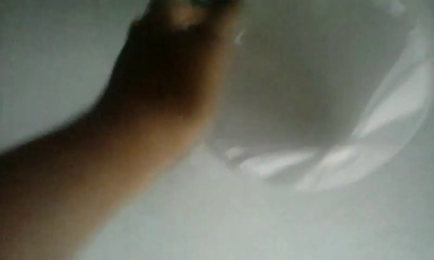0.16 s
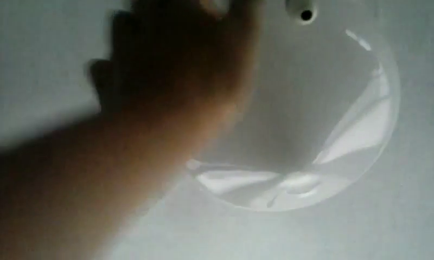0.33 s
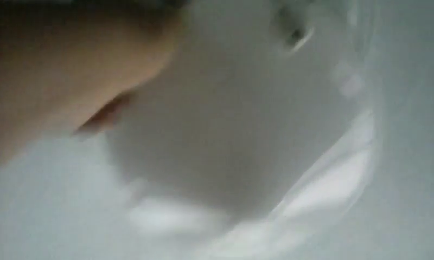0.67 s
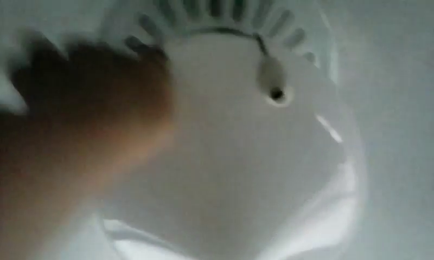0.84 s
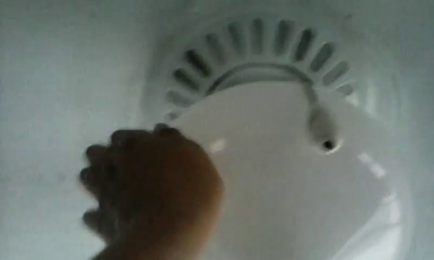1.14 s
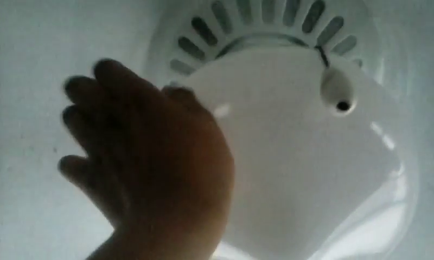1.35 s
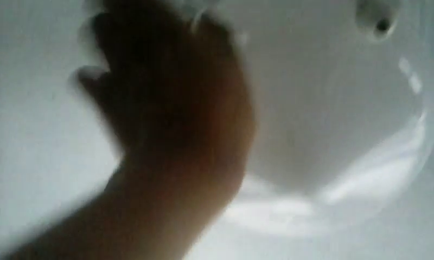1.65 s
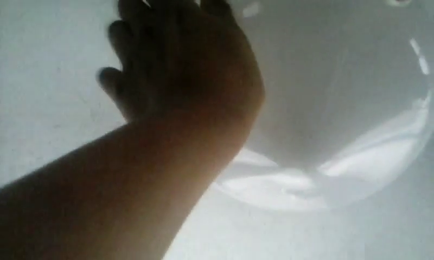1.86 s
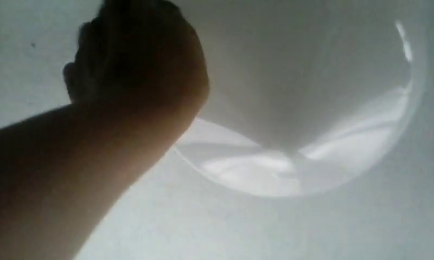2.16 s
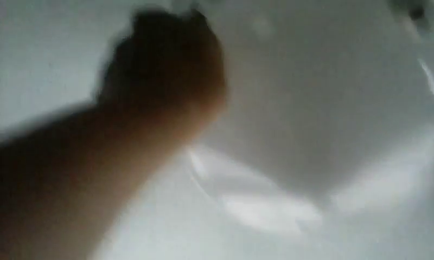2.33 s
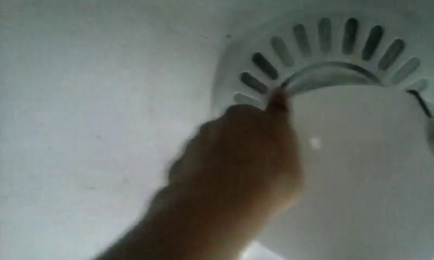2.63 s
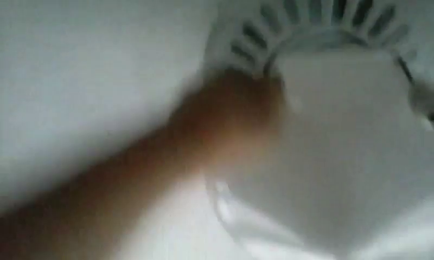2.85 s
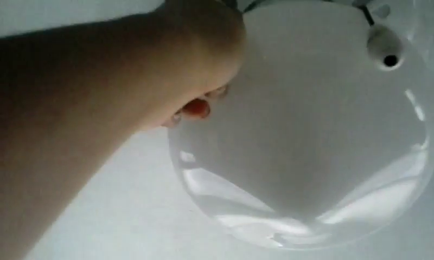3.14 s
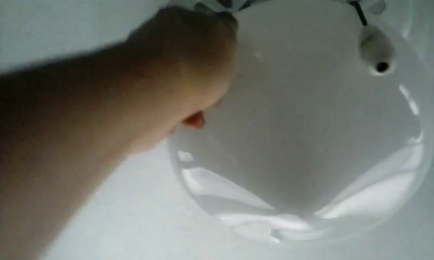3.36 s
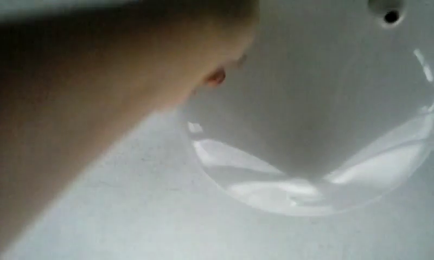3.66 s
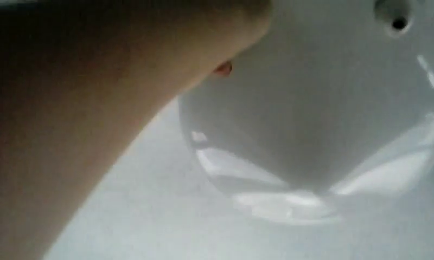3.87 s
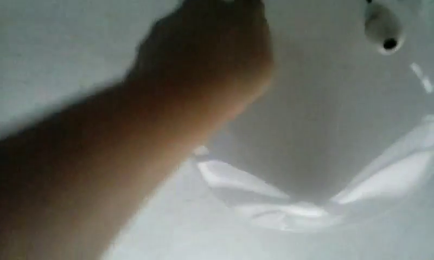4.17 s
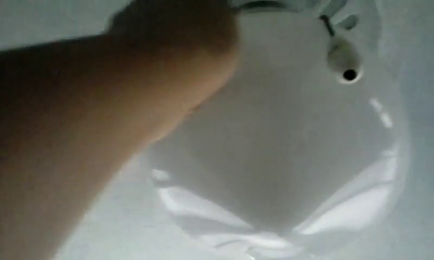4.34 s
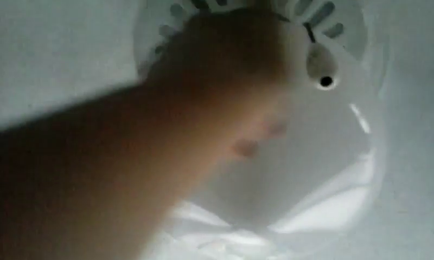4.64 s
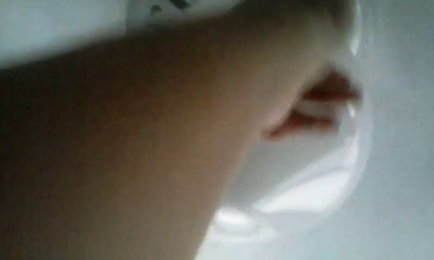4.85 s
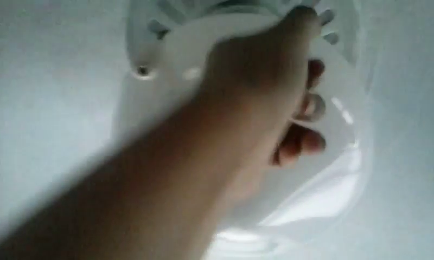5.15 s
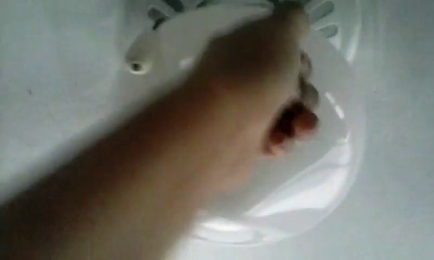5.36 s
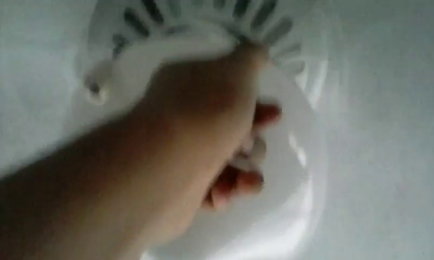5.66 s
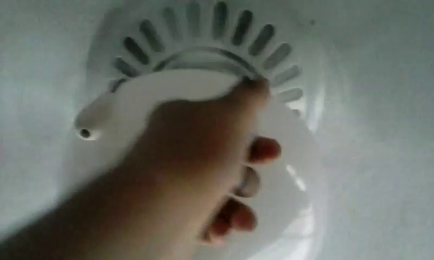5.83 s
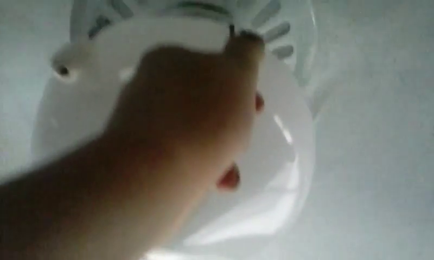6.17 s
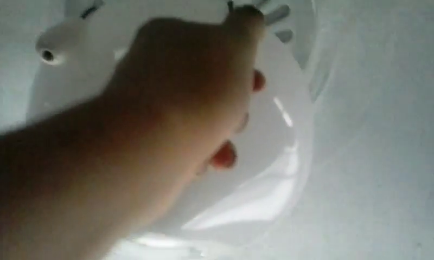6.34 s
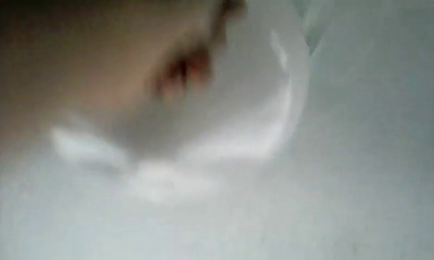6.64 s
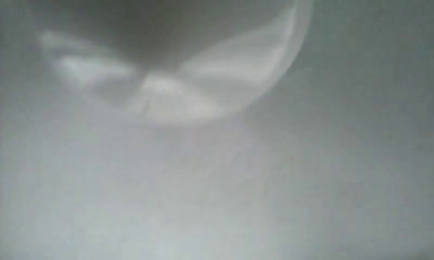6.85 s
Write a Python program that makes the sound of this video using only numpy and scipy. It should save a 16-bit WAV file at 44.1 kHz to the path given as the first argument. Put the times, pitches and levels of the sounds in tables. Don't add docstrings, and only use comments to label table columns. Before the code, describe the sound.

Sharp, dry clicks and thin glass clinks begin over soft room rumble and hiss. After quieter taps and sliding fingers, three rapid groups of loud metallic cracks and chain rattle arrive, each pull booming softly in the ceiling, while a low motor hum runs briefly. Lighter glass knocks lead to one more strong snap, then it fades to faint rubbing. Close, small-room sound with a piercing treble edge.

```python
import sys
import numpy as np
from scipy import signal
from scipy.fft import rfft, irfft
from scipy.io import wavfile

SR = 44100
rng = np.random.default_rng(int(sys.argv[2]) if len(sys.argv) > 2 else 0)


def unload_audio(sound):
    columns = np.transpose(np.atleast_2d(sound))
    steps = np.round(np.clip(columns, -1, 1) * 32767)
    wavfile.write(sys.argv[1], SR, steps.astype(np.int16))


def volts(x):
    e = np.asarray(x, float) / 20
    return 10 ** e


N = 308700
TOP_HZ = 15850

# (lower limit [Hz], upper limit [Hz])
BANDS = [(480, 2000), (2000, 4500), (4500, 6500), (6500, 10000), (10000, 16000)]
CEILING_HZ = [102.9, 224.2, 75.9, 141.5]
# (time [s], boom [dB], upper mode [dB re boom], lower mode [dB re boom], air sway [dB])
THUDS = [(1.93, -46, -23, 8, -64), (2.828, -24, -11, -32, -32), (2.961, -39.5, -4.5, -18, -43.5),
         (3.032, -42.5, -12.5, -0.5, -60), (3.138, -47, -6, -11, -63), (3.518, -25.5, -8.5, -34, -31.5),
         (3.711, -41.5, -13, -28, -39.5), (4.11, -24.5, -10.5, -17, -33), (5.363, -40.5, 4, -20.5, -33.5),
         (5.659, -51.5, 4, 7, -62), (5.948, -48, -11.5, -13, -46.5)]


def rms_one(x):
    return x / np.sqrt(np.mean(x ** 2) + 1e-20)


def drift(rate):
    r = np.exp(-80 * np.pi * rate / SR)
    slow = signal.lfilter([1], [1, -2 * r, r * r], rng.standard_normal(N // 40 + 2002))[2000:]
    return np.interp(np.arange(N) / 40, np.arange(len(slow)), rms_one(slow))


def coloured(spectrum, size):
    hz = np.maximum(np.fft.rfftfreq(size, 1 / SR), 1)
    at, level_db = np.transpose(spectrum)
    white = rfft(rng.standard_normal(size))
    return white * volts(np.interp(np.log(hz), np.log(at), level_db)), hz


def ring(clicks, hz, t60):
    r, w = volts(-60 / (t60 * SR)), 2 * np.pi * hz / SR
    return signal.lfilter([0, np.sin(w)], [1, -2 * r * np.cos(w), r * r], clicks + 1e-18)


def swell_ring(clicks, hz, t60, rise, split):
    contact = ring(clicks, hz, rise) * np.log(1000) / (rise * SR)
    return ring(contact, hz * (1 - split), t60) + ring(contact, hz * (1 + split), 2.3 * t60)


def glass():
    # (time [s], peak [dB], 2-4 kHz body [dB re peak], over 10 kHz edge [dB re peak], t60 [s])
    bead_hits = [(0.505, 1, -37, -38, 0.21), (0.5577, -9, -35, -20, 0.39), (0.5748, -10.5, -16, -16, 0.23),
                 (0.7189, -41, -8, -23, 0.084), (0.7362, -13.5, -20, -14.5, 0.2),
                 (0.954, -30.5, -33, -31, 0.084), (0.969, -26.5, -26, -31, 0.12),
                 (0.988, -18.5, -46, -16, 0.14), (1.288, -28, -22, -26, 0.078),
                 (1.3653, -33.5, -19, -9, 0.08), (1.5517, -34, -22.5, -10, 0.63),
                 (1.7655, -18, -20, -20, 0.49), (2.3966, -19, -52, -17.5, 0.029),
                 (2.732, -35.5, -33, -23, .1), (3.8756, -9.5, -52, -15, 0.27),
                 (4.6825, -23, -21, -13, 0.24), (4.719, -17.5, -27.5, -18, 0.49),
                 (5.0305, -24.5, -22, -17.5, 0.42), (5.093, -35.5, -30, -8, .2),
                 (5.175, -43.5, -30.5, -12, .1), (5.32, -41.5, -30, -15, .1),
                 (5.234, -42, -23.5, -10, 0.032)]
    # (frequency [Hz], level [dB], t60 [s])
    globe = [(2428, -3, 1.3), (3115, 0, 1.0), (3460, -5, 1.0), (4830, -5, 1.0), (5670, 0, 1.0),
             (6590, -12, .5), (6900, -11, .5), (7210, -3, .4), (7430, -5, .4), (7655, 0, .2),
             (7920, -1, .3), (8180, -3, .3), (8560, -6, .25), (8950, -7, .3), (9460, -11, .3),
             (10030, -1, .4), (10720, 0, .4), (11540, -1, .4), (12440, -5, .3), (13470, -8, .3)]
    globe_ring_db = [-20, -19, -27, -17, -14]
    # (frequency [Hz], density [dB per Hz])
    shimmer = [(240, -57.5), (400, -30), (2090, -40), (2360, -20), (2840, -19), (3070, -5), (3310, -24),
               (5190, -34.5), (7870, -0.5), (9920, -19), (16000, -46)]
    # (time [s], frequency [Hz], level [dB])
    glass_parts = [(.508, 3120, -41), (.508, 3400, -43), (.576, 3106, -35), (.576, 3480, -39),
                   (.719, 3100, -43), (.738, 3430, -43), (.738, 3104, -42), (.991, 5660, -52),
                   (2.319, 2940, -56), (3.876, 3380, -39), (3.876, 6360, -33), (3.876, 5820, -42),
                   (3.876, 10600, -36), (4.685, 4820, -55), (4.721, 4800, -48), (4.721, 5590, -39),
                   (.559, 5650, -40), (3.876, 8150, -15.5), (1.77, 3520, -54), (4.721, 2434, -48.5),
                   (4.718, 3150, -60), (5.035, 2770, -54), (5.035, 2970, -64), (5.375, 2250, -35),
                   (6.006, 8220, -35.5)]
    # (time [s], frequency [Hz], level [dB])
    bell = [
        (.508, 2424, -45.5),
        (.576, 2425, -42),
        (.738, 2424, -47),
        (6.5, 2500, -58),
        (6.93, 2470, -60),
    ]
    shoulder_db = -17
    clinks = contacts([(*row, shoulder_db) for row in bead_hits], low_db=-36.5)
    out = struck(clinks, globe, ring_db=globe_ring_db, spread_db=4.5, longest=0.19, rise=0.0033)
    out += rattle(clinks, shimmer, [-14, -13, -17], [0.006, 0.03], grain_db=4.0, ripple_db=3.0, rise=0.0026)
    return out + pings(glass_parts, t60=0.16, loose=0.15) + pings(bell, t60=0.5, loose=0.15)


def metal():
    # (time [s], peak [dB], 2-4 kHz body [dB re peak], t60 [s],
    # 5-6 kHz shoulder [dB re peak])
    pulls = [(2.797, -21, -22, 0.56, -13), (2.8252, -10, -14, 0.43, -4), (2.8394, -6.5, -15.5, 0.19, -8.5),
             (2.861, -11, -12.5, 0.32, -9), (2.8959, -23.5, -17, 0.36, -14), (2.9174, -16, -24, 0.61, -12),
             (3.491, -14.5, -22, 0.59, -4.5), (3.5267, -10, -14.5, 0.45, -14),
             (3.5438, -1.5, -19, 0.083, -5.5), (3.56, -18.5, -3, 0.23, -14),
             (4.0648, -29.5, -22.5, 0.6, -11.5), (4.0946, -12, -24.5, 0.63, -6.5),
             (4.1092, -12, -10.5, 0.45, -9), (4.126, -3, -14.5, 0.17, -10), (4.144, -12, -18, 0.17, -6),
             (5.3499, -14.5, -23, 0.68, -4), (5.3722, 2, -27, 0.05, -14), (5.4, -30, 2, 0.35, 2),
             (5.4325, -15, -50, 0.27, -11)]
    # (time [s], peak [dB], body [dB re peak], edge [dB re peak],
    # shoulder [dB re peak])
    returns = [(2.97, -10.5, -14.5, -32, -5), (3.056, -12, -21.5, -31, -9), (3.103, -14, -14.5, -33, -7.5),
               (3.1658, -3, -17.5, -15, -9), (3.662, -13, -28, -25, -11), (3.6739, -24, -6.5, -25, -4),
               (3.71, -19, -13, -22, -9), (3.7217, -9.5, -24, -27, -8), (3.7513, -9.5, -17, -29, -11),
               (3.7812, -3.5, -19.5, -13.5, -11.5), (4.2605, -18, -31, -26, -14),
               (4.3291, -12.5, -20, -24, -9.5), (4.374, -11.5, -22.5, -30, -11),
               (4.4481, -4.5, -23, -23.5, -6.5), (4.5496, -20.5, -18.5, -15, -11),
               (4.5933, -27.5, -32, -12, -12), (5.6359, -11, -23, -13, -11.5),
               (5.671, -9.5, -15, -10.5, -9)]
    # (time [s], peak [dB], body [dB re peak], edge [dB re peak])
    shifts = [
        (1.8851, -17, -16, -8.5),
        (1.954, -30, -14.5, -13),
        (2.578, -42, -35.5, 6.5),
        (2.6613, -36.5, -30, -7),
        (5.9364, -59.5, 4, -5),
    ]
    # (frequency [Hz], level [dB], t60 [s])
    mount = [(740, -2, .1), (1720, 0, .2), (2200, -9, .1), (2650, -1, .2), (2830, -4, .1), (3390, 0, .2),
             (3910, -2, .1), (4450, -1, .15), (4760, -6, .15), (5540, 0, .2), (5720, -8, .1),
             (6220, -5, .1), (6560, -8, .15), (6800, -5, .2), (7430, -4, .15), (7650, -1, .2),
             (7915, 0, .2), (8145, -1, .2), (8335, -4, .2), (8750, -8, .15), (9300, -12, .1),
             (10700, 0, .1), (12300, -2, .1)]
    mount_ring_db = [-22, -19, -20, -21, -29]
    # (frequency [Hz], density [dB per Hz])
    rattle_colour = [(240, -55.5), (400, -23.5), (719, -14), (852, -21.5), (1250, -21.5), (1710, -15),
                     (3210, -19), (4310, -18.5), (5190, -12.5), (5600, -10.5), (7990, 3), (9760, -13.5),
                     (16000, -20.5)]
    # (time [s], frequency [Hz], level [dB])
    mount_parts = [(1.887, 2230, -36), (2.828, 720, -29), (2.97, 3430, -25.5), (3.166, 3914, -24),
                   (3.492, 3400, -26), (3.492, 2600, -33), (3.53, 670, -34), (3.675, 3430, -30),
                   (3.712, 3300, -34), (4.11, 3460, -31.5), (4.126, 752, -28), (4.376, 2400, -39),
                   (4.376, 1600, -46), (4.33, 1710, -47), (4.39, 4100, -40), (4.127, 1860, -31.5),
                   (3.057, 4430, -41.5), (3.103, 4460, -37), (2.97, 4300, -34), (3.166, 6800, -21),
                   (2.9, 5530, -26), (3.544, 4800, -25), (1.89, 4450, -45), (5.68, 4400, -37),
                   (5.375, 230, -31), (5.637, 790, -45), (5.676, 217, -39)]
    pull_edge_db, return_t60_s = -21.5, 0.27
    shift_t60_s, shift_shoulder_db = 0.25, -10.5
    pull_rows = [(s, db, body, pull_edge_db, t60, shoulder) for s, db, body, t60, shoulder in pulls]
    snaps = contacts(pull_rows, low_db=-20.5)
    snaps += contacts([(*row[:4], return_t60_s, row[4]) for row in returns], low_db=-25.5)
    snaps += contacts([(*row, shift_t60_s, shift_shoulder_db) for row in shifts], low_db=-29)
    out = struck(snaps, mount, ring_db=mount_ring_db, spread_db=4.0, longest=0.15, rise=0.003)
    out += rattle(snaps, rattle_colour, [-6, -9, -15], [0.006, 0.03], grain_db=2.0, ripple_db=4.0, rise=0.002)
    return out + pings(mount_parts, t60=0.13, loose=0.5)


def hand_knocks():
    # (time [s], frequency [Hz], level [dB])
    knocks = [(1.883, 1120, -35), (1.935, 1175, -42), (5.372, 438, -26), (5.373, 498, -30.5),
              (5.372, 1160, -30), (3.782, 12300, -26), (2.732, 4900, -48), (5.67, 4200, -22),
              (3.166, 1750, -18), (.576, 4200, -36), (5.4, 1100, -45), (5.936, 880, -50), (5.598, 980, -50),
              (.576, 4400, -37)]
    return pings(knocks, t60=0.04, loose=0.78)


def cracks():
    # (time [s], peak [dB], edge [dB re peak])
    first_contacts = [(.5062, -18.5, -33), (.5592, -12, -30), (0.7357, -24, -30), (1.8847, -32, -10),
                      (2.398, -44, -15), (2.825, -13, -21), (2.84, -5, -20), (2.971, -12, -28),
                      (3.0584, -13, -25), (3.1035, -15, -25), (3.1657, -7.5, -12), (3.4912, -30, -18),
                      (3.5442, -11, -18), (3.7825, -2.5, -9.5), (3.8758, -13, -9), (4.1255, -7, -15.5),
                      (4.33, -14, -25), (4.376, -12, -28), (4.45, -6, -11.5), (5.3501, -15, -12),
                      (5.375, -10, -15), (5.6367, -19, -8), (5.6708, -10, -14.5), (5.6725, -10, -12)]
    spray_t60_s = 0.012
    s, peak_db, edge_db = np.transpose(first_contacts)
    at, clicks, sprays = np.round(s * SR).astype(int), np.zeros(N), np.zeros(N)
    clicks[at], sprays[at] = volts(peak_db), volts(peak_db + edge_db)
    treble = signal.butter(4, 11600, "high", fs=SR, output="sos")
    bright = signal.sosfilt(treble, rng.standard_normal(N))
    spray = signal.lfilter([1], [1, -volts(-60 / (spray_t60_s * SR))], sprays) * rms_one(bright)
    no_lows = signal.butter(2, 4500, "high", fs=SR, output="sos")
    return signal.sosfilt(no_lows, ring(clicks, hz=7870, t60=0.0031)) + spray


def contacts(rows, low_db):
    follows_body = 0.45
    return [(s, db, body, low_db + follows_body * (body + 20), edge, t60, shoulder)
            for s, db, body, edge, t60, shoulder in rows]


def band_peaks(hits):
    _, peak, body, low, edge, _, shoulder = np.transpose(hits)
    return np.array([peak + low, peak + body, peak + shoulder, peak, peak + edge])


def struck(hits, modes, ring_db, spread_db, longest, rise):
    at = [round(hit[0] * SR) for hit in hits]
    peaks, modes = band_peaks(hits), np.array(modes)
    chance, out = rng.standard_normal((len(hits), 2, len(modes))), np.zeros(N)
    band = np.searchsorted([b[1] for b in BANDS], modes[:, 0])
    for k, (hz, level_db, t60) in enumerate(modes):
        clicks = np.zeros(N)
        mode_db = level_db - modes[band == band[k], 1].max() + ring_db[band[k]]
        strength_db = peaks[band[k]] + mode_db + spread_db * chance[:, 0, k]
        clicks[at] = volts(strength_db) * np.sign(chance[:, 1, k])
        held = min(t60, longest * np.sqrt(2500 / hz))
        ringing = swell_ring(clicks, hz, held, rise, split=rng.uniform(0.0014, 0.003))
        out += ringing * volts(1.5 * drift(60.0))
    return out


def soft_band(hz, low, high):
    return 1 / (1 + (low / hz) ** 14) / (1 + (hz / high) ** 14)


def rattle(hits, colour, levels_db, t60s, grain_db, ripple_db, rise):
    out, t = np.zeros(N + SR), np.arange(SR // 2) / SR
    grain = volts(grain_db * drift(150.0))
    band_damping = [1.24, 1.11, 2.35, 1.99, 1.02]
    for hit, peaks in zip(hits, band_peaks(hits).T):
        at = round(hit[0] * SR)
        bins, hz = coloured(colour, size=len(t))
        bins = bins * volts(ripple_db * np.interp(hz, np.linspace(0, SR / 2, 70), rng.standard_normal(70)))
        for (low, high), peak_db, damping in zip(BANDS, peaks, band_damping):
            decays = [*t60s, max(hit[5], 0.01) / damping]
            shape = sum(volts(db - 60 * t / t60) for db, t60 in zip(levels_db, decays))
            noise = rms_one(irfft(bins * soft_band(hz, low, high), len(t))) * grain[at:at + len(t)]
            noise /= np.sqrt(np.std(noise[:SR // 100]))
            out[at:at + len(t)] += volts(peak_db) * shape * (1 - np.exp(-t / rise)) * noise
    return out[:N]


def pings(rows, t60, loose):
    out, t = np.zeros(N + SR), np.arange(SR // 2) / SR
    for s, hz, level_db in rows:
        impulse = signal.unit_impulse(len(t))
        clean = swell_ring(impulse, hz, 0.6 * t60, rise=0.01, split=rng.uniform(1.7, 15) / hz)
        shaken = rms_one(ring(rng.standard_normal(len(t)), hz, 0.033))
        shaken = shaken * volts(-60 * t / t60) * (1 - np.exp(-t / 0.002))
        out[round(s * SR):][:len(t)] += volts(level_db) * ((1 - loose) * clean + loose * shaken)
    return out[:N] * volts(1.6 * drift(67.0))


def room(x):
    t60_s, t = 0.28, np.arange(SR // 2) / SR
    echo = rng.standard_normal(len(t)) * volts(-60 * t / t60_s) * (t > 0.004)
    return signal.fftconvolve(x, echo / np.sqrt(np.sum(echo ** 2)))[:N]


def thuds():
    thud_s, puff_db = 0.098, -19
    out, t = np.zeros(N), np.arange(round(thud_s * SR)) / SR
    puff_band = signal.butter(2, [130, 300], "band", fs=SR, output="sos")
    puff = rms_one(signal.sosfilt(puff_band, rng.standard_normal(N)))
    for s, boom_db, upper_db, lower_db, _ in THUDS:
        mode_hz = CEILING_HZ * (1 + 0.0076 * rng.standard_normal(4))
        levels_db = [0, upper_db, lower_db, -18.0]
        boom = sum(volts(db) * np.sin(2 * np.pi * hz * t) for hz, db in zip(mode_hz, levels_db))
        boom += volts(puff_db) * puff[round(s * SR):][:len(t)]
        out[round(s * SR):][:len(t)] += volts(boom_db - 0.5) * np.hanning(len(t)) * boom
    return out


def hum():
    on_s, spin_up_s, off_s, run_down_s = 2.93, 0.017, 4.14, 0.041
    t = np.arange(N) / SR
    running = (1 + np.tanh((t - on_s) / spin_up_s)) * (1 - np.tanh((t - off_s) / run_down_s)) / 4
    level = volts(-50 + 3.5 * drift(5.2))
    return np.sqrt(2) * running * level * np.sin(2 * np.pi * 119.3 * t)


def in_time(rows):
    s, level_db = np.transpose(rows)
    return np.interp(np.arange(N) / SR, s, level_db)


def patchy(spectrum, patchy_db):
    shared = 0.35
    bins, hz = coloured(spectrum, size=N)
    together, out = drift(0.75), 0
    half_octave = np.round(2 * np.log2(np.clip(hz, 40, 16000)))
    for k in np.unique(half_octave):
        part = irfft(bins * (half_octave == k) * (hz < TOP_HZ), N)
        out = out + part * volts(patchy_db * (shared * together + drift(15.0)))
    return rms_one(out)


def narrow_noise(hz, t60):
    return rms_one(ring(ring(rng.standard_normal(N), hz, t60), hz, t60))


def stroke(s, db, swell, fade):
    t = np.arange(N) / SR
    return volts(db - np.maximum(swell * (s - t), fade * (t - s)))


def skin_on_glass(slide_db, press_db):
    # (frequency [Hz], density [dB per Hz])
    slide = [(2060, -51.5), (3500, -33), (4490, -35), (5220, -27), (6160, -19.5), (7650, -3), (8050, 2),
             (9440, -8), (11500, -17.5), (15000, -21.5), (16000, -21)]
    # (frequency [Hz], density [dB per Hz])
    rub_colour = [(3500, -10), (4600, -6), (5500, 3.5), (6500, 4), (8000, -27.5)]
    # (peak time [s], level [dB], swell [dB per s], fade [dB per s])
    rubs = [
        (.41, -59, 600, 150),
        (2.78, -66, 100, 200),
        (6.49, -63, 400, 45),
    ]
    whistle_hz = [2470, 2670]
    rubbing = sum(stroke(*row) for row in rubs)
    whistle = sum(volts(3.5 * drift(7.1)) * narrow_noise(hz, 0.013) for hz in whistle_hz)
    sliding = volts(slide_db - 0.6) * patchy(slide, patchy_db=1.5)
    return sliding + rubbing * patchy(rub_colour, patchy_db=1.0) + volts(-78 + 0.4 * press_db) * whistle


def sway(rest_db):
    rise_s, t60_s = 0.022, 0.73
    t, level = np.arange(N) / SR, volts(rest_db - 7.5)
    for s, *_, sway_db in THUDS:
        after = np.maximum(t - s, 0)
        level = level + volts(sway_db - 60 * after / t60_s) * (1 - np.exp(-after / rise_s))
    return level * narrow_noise(92.7, 0.04)


def room_air(room_db):
    # (frequency [Hz], density [dB per Hz])
    rumble = [(18, -32), (30, -12), (75, 3), (194, -4), (232, 2), (287, -4.5), (398, -0.5), (888, -17),
              (1190, -35), (1500, -26), (1950, -46.5), (3300, -120)]
    # (peak time [s], level [dB], swell [dB per s], fade [dB per s])
    rustle = (.13, -64, 25, 130)
    air = volts(room_db + 0.5) * patchy(rumble, patchy_db=3.5)
    air += sway(room_db[0] + 0.41 * (room_db - room_db[0]))
    air += volts(room_db - 12 + 3.84 * drift(7.6)) * narrow_noise(CEILING_HZ[1], 0.08)
    return air + stroke(*rustle) * narrow_noise(1900, 0.0055)


def ducking():
    # (time [s], depth [dB], half width [s])
    dips = [
        (5.0, -6, 0.039),
        (5.225, -9, 0.011),
        (5.92, -8.5, 0.038),
        (6.315, -8, 0.0082),
        (6.354, -8.5, 0.018),
    ]
    t = np.arange(N) / SR
    return volts(sum(db * np.exp(-((t - s) / width) ** 2) for s, db, width in dips))


def background():
    # (time [s], level [dB])
    skin_levels = [(0, -50.5), (.35, -52.5), (.41, -47), (.85, -53.5), (1.17, -52), (1.63, -56),
                   (2.0, -45.5), (2.34, -59), (2.46, -50.5), (3.35, -54.5), (4.05, -50), (4.8, -53),
                   (5.22, -55.5), (5.9, -52.5), (6.02, -50), (6.41, -59), (6.55, -43), (6.8, -59.5)]
    # (time [s], level [dB])
    fade_levels = [(0, -52), (1.05, -51.5), (1.4, -52), (2.0, -52), (3.7, -53), (4.7, -64), (5.5, -57.5),
                   (5.9, -63.5), (7, -65.5)]
    # (frequency [Hz], density [dB per Hz])
    hiss = [(500, -18.5), (800, 2.5), (1300, -3.5), (2000, -3), (3300, -9), (5000, -15.5), (7000, -37)]
    slide_db, room_db = in_time(skin_levels), in_time(fade_levels)
    press_db = slide_db - slide_db.mean()
    hiss_db = -68.5 + 0.48 * press_db + 0.22 * (room_db - room_db.mean())
    return room_air(room_db) + skin_on_glass(slide_db, press_db) + volts(hiss_db) * patchy(hiss, patchy_db=3.5)


def scene():
    hits = glass() + metal() + hand_knocks()
    sharp = cracks()
    below_top = signal.cheby2(14, 40, TOP_HZ + 150, fs=SR, output="sos")
    tails = signal.sosfilt(below_top, hits + volts(-5) * room(hits + sharp))
    return (sharp + tails + thuds() + hum() + ducking() * background())[None]


def low_pass(x):
    return signal.sosfilt(signal.butter(12, 16990, fs=SR, output="sos"), x)


def record(dry):
    heard = signal.sosfilt(signal.butter(4, 55, "high", fs=SR, output="sos"), dry)
    heard = 1.05 * np.tanh(heard / 1.05)
    heard = signal.sosfilt(signal.cheby2(12, 60, 16900, fs=SR, output="sos"), heard)
    return low_pass(heard)


dry = scene()
out = record(dry)
unload_audio(out)
```